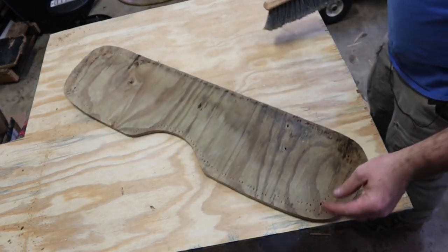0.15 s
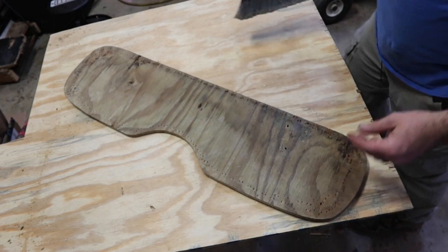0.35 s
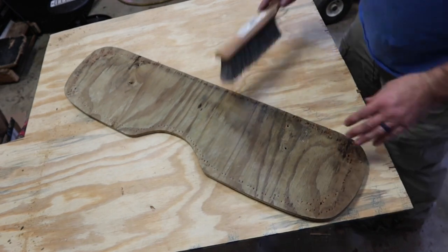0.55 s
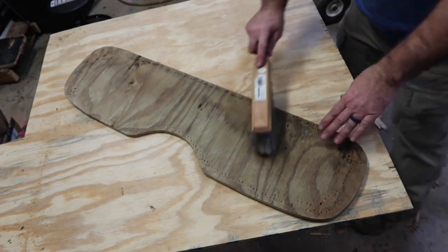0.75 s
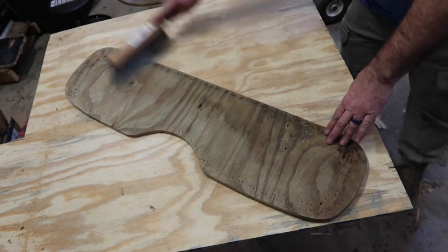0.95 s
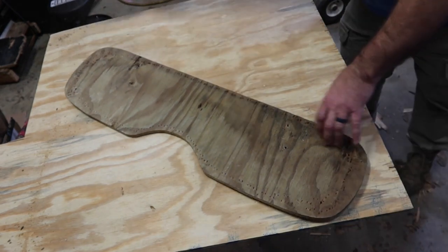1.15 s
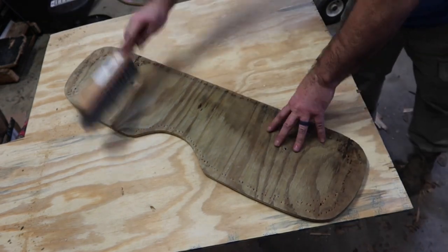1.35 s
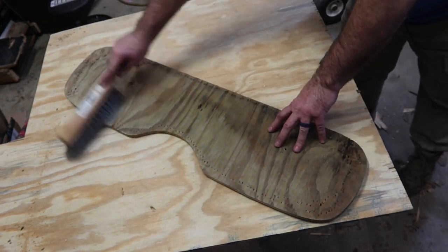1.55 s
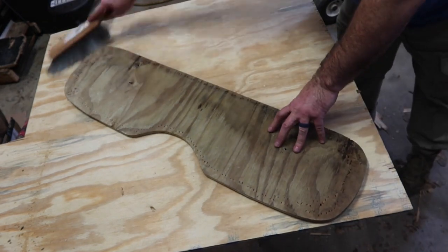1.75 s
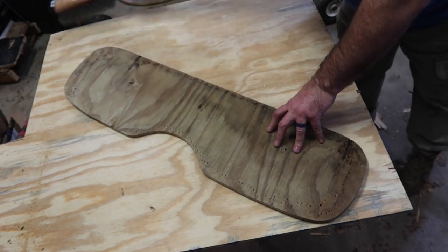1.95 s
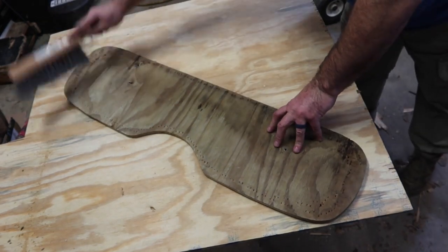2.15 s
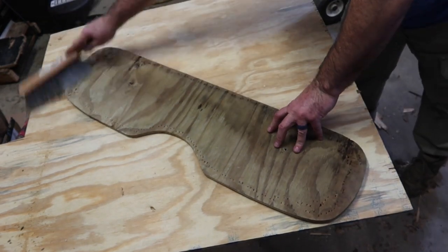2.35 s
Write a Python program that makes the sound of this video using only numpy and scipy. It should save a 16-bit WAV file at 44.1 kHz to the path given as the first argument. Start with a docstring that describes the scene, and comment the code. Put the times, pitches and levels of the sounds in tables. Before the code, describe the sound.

Plywood board knocks and rocks down on a wooden bench, followed by dry, hissy bristle brush strokes

```python
"""Heard first and closest: a shaped plywood board drops on a plywood table, rocks and knocks, and a stiff brush
sweeps it in short strokes. A hand slides and taps, loose grit ticks; the garage hums and hisses behind.
Knocks ring the modes of the wood, brushing is clumped random slips through coloured bands,
slaps and ticks are dying puffs of noise. One close, nearly mono microphone, with a little garage reverberation.
"""
import sys
import numpy as np
from scipy import signal
from scipy.fft import rfft, irfft, next_fast_len
from scipy.io import wavfile
from scipy.ndimage import uniform_filter1d, map_coordinates

SR = 44100
rng = np.random.default_rng(int(sys.argv[2]) if len(sys.argv) > 2 else 0)


def level_to_linear(level):
    """Convert decibel levels to linear amplitude factors, elementwise."""
    exponent = np.asarray(level, float) / 20
    return 10 ** exponent


def unload_wav(signal):
    """Save mono or channel-first audio to the path in sys.argv[1] as 16-bit WAV at rate SR, clipped to [-1, 1]."""
    wavfile.write(
        sys.argv[1],
        SR,
        np.round(np.clip(np.atleast_2d(signal).T, -1, 1) * 32767).astype(np.int16),
    )


N = 105840
T = np.arange(N) / SR

# Background hiss: [t/s, level/dB], and its colour: [f/Hz, relative level/dB]
AIR_LEVEL = [(0, -39), (.26, -48), (.275, -81.5), (.33, -45.5), (.9, -42), (1.5, -46.5), (2.15, -46.5),
             (2.23, -54.5), (2.4, -52)]
AIR_COLOUR = [(300, 3), (600, 9), (2600, -1.5), (5000, -4), (7000, -10), (12200, -9.5), (16300, -53)]
# Hum: mean pitch and level, both of which waver
HUM_HZ, HUM_DB = 187, -46
# Faint whistles: [f/Hz, level/dB], and their common bend: [t/s, share of pitch]
WHISTLES = [(10550, -58), (11850, -57), (13350, -63)]
WHISTLE_BEND = [(.03, -.02), (.075, .012), (.175, -.03)]
# Decay of the garage: [f/Hz, t60/s]
ROOM_DECAY = [(200, 0.76), (2000, 0.253), (12000, 0.32)]
ROOM_DB = -14.5

# Small wobbles of the board: [t/s, low band level/dB, upper band level/dB]
RATTLE_LEVEL = [(0, -37, -42), (.16, -41.5, -52), (.24, -29.5, -30.5), (.4, -25, -28.5), (.6, -39.5, -90.5),
                (.66, -29.5, -38.5), (1.1, -52.5, -82), (1.26, -27.5, -27.5), (1.38, -41, -62),
                (1.63, -31.5, -48), (1.72, -32, -32.5), (1.9, -33, -40), (2.05, -21, -38.5),
                (2.2, -35.5, -53), (2.4, -40.5, -53.5)]
# Colours of the two rattle bands: [f/Hz, relative level/dB]
RATTLE_LOW = [(20, 14.5), (60, 10), (200, 4), (350, -0.5), (650, -52)]
RATTLE_UP = [(250, -38), (400, -7.5), (850, -11.5), (3500, -30.5), (6000, -69)]
# Board edge dragging: [t/s, level/dB], and its colour: [f/Hz, relative level/dB]
SQUEAK_LEVEL = [(.15, -60), (.18, -33.5), (.23, -30.5)]
SQUEAK_COLOUR = [(560, -24), (790, 15), (890, 13.5), (1250, -42)]

# Loose grit ticking: [t/s, peak level/dB, centre f/Hz]
TICKS = [(0.7453, -13.5, 5035), (0.829, -24.5, 11600), (0.9, -17.5, 8900), (0.9365, -6.5, 10100),
         (0.9508, -8.5, 11500), (0.959, -14.5, 9900), (0.963, -10, 10300), (0.994, -3.5, 10500),
         (1.36, -26.5, 6000), (1.4163, -23.5, 11000), (1.4859, -20.5, 8440), (1.561, -28.5, 6600),
         (2.2034, -33, 3970), (2.2693, -30.5, 3650)]
# Hard edges slapping: [t/s, peak level/dB, centre f/Hz, width/octaves, t60/s]
SLAPS = [(.253, -19, 1040, 0.098, 0.055), (.2634, -6.5, 1760, 0.13, 0.011), (.2637, -20, 4350, 0.68, 0.014),
         (.365, -21, 3570, 0.6, 0.012), (.416, -25.5, 3673, 0.203, 0.228), (.9695, -16, 873, 0.19, 0.071),
         (.969, -10.5, 2690, 0.95, 0.061), (.9863, -4, 10000, 0.145, 0.02), (1.217, -4.5, 3000, 1.27, 0.05),
         (1.423, -23, 1800, 1.1, 0.012), (1.526, -32, 1023, 1.3, 0.04), (1.654, -14.5, 2730, 0.37, 0.025),
         (1.6536, -15, 6150, 0.94, 0.029)]
# Grit decay; width in octaves is TICK_WIDTH_HZ over the centre; treble limit of slaps and ticks
TICK_T60_S, TICK_WIDTH_HZ, TOP_HZ = 0.0025, 3500, 14000

# Board knocking on the table: [first touch t/s, peak level/dB, contact/ms, favoured f/Hz]
KNOCKS = [(0.23, -4.5, 0.55, 287), (0.262, -7.5, 0.61, 352), (0.274, -20.5, 0.575, 371),
          (0.342, -6.5, 0.57, 181), (0.362, -7, 0.143, 100.3), (0.384, -25, 0.86, 116),
          (0.477, -10.5, 0.67, 190), (0.487, -13.5, 1.3, 116), (0.651, -15, 1.7, 161.7),
          (0.754, -17.5, 2.3, 153.4), (0.814, -18, 1.7, 145.3), (0.924, -14.5, 1.3, 70.0),
          (0.943, -18, 0.29, 70.0), (0.966, -12, 0.324, 72), (1.215, -13.5, 0.2, 176),
          (1.249, -14, 1.6, 164), (1.295, -14.5, 6.7, 122), (1.393, -9, 0.69, 140),
          (1.529, -11.5, 0.75, 158), (1.649, -7, 0.83, 167), (1.687, -16, 0.67, 145),
          (1.729, -17, 1.1, 170), (2.013, -10.5, 0.27, 100), (2.107, -13.5, 1.3, 100)]
# Modes of board and table: [f/Hz, level/dB, t60/s]
WOOD_MODES = [(67.96, 10, 0.069), (100, 2, 0.14), (115.5, -3.5, 0.086), (166.3, 3, 0.1), (215, -0.5, 0.055),
              (273.3, -2, 0.08), (355.7, 0, 0.094), (503, -1, 0.075), (614.5, -1.5, 0.08), (802, -1, 0.076),
              (898, 4.5, 0.041), (1470, 5, 0.032)]
MODE_SCATTER_DB = 2  # random spread of each mode from knock to knock
FAVOUR_DB = 7.5  # loss per octave away from the favoured pitch
SETTLE_S = 0.002603  # the blow builds this long after first touch
SWELL_CYCLES = 0.35  # a mode takes this long to take up the blow, so the lows arrive last

# Brush strokes, a list of rows each:
# [t/s, bristle tips level/dB, bristle shafts over tips/dB, board scrape over tips/dB]
STROKES = [
    [(.61, -40, -13, -18.5), (.618, -32.5, -9.5, -12.5), (.665, -29.5, -1, -6.5), (.71, -42.5, 3.5, -1),
     (.865, -56, -6.5, -18.5)],
    [(.875, -48.5, 0.5, 7), (.91, -33.5, 1, -1), (.975, -24, -15, -13), (1.005, -27.5, -5.5, -6.5),
     (1.05, -23, -1.5, -5.5), (1.1, -21.5, -2, -9), (1.19, -24, -2, -13), (1.235, -38, 2.5, 4),
     (1.29, -43.5, 5.5, 4.5), (1.33, -66, 14, 12)],
    [(1.675, -47.5, 5, 12), (1.72, -33, 4.5, -4), (1.78, -33, 3.5, 0), (1.87, -30, 4.5, -2),
     (1.96, -32, 5, -0.5), (2.03, -36.5, 3.5, 1.5), (2.095, -44, 3.5, 3.5), (2.115, -55, 3, -3.5)],
]
# Hand and board sliding, same columns
SLIDES = [
    [(.13, -68, 0, 20), (.19, -41.5, -0.97, 0.52), (.24, -46.5, -1.2, 7.3)],
    [(.415, -44, 0.99, -24.5), (.46, -46, -0.27, 1), (.58, -68, 0, -5)],
    [(1.45, -58.5, 3, 7.2), (1.64, -59.5, -10, 7.5)],
]
# Colours of bristle tips, bristle shafts and board scrape: [f/Hz, relative level/dB]
TIPS_COLOUR = [(6000, -44), (8500, -5), (11700, -3), (14400, -25), (16000, -61)]
SHAFTS_COLOUR = [(3200, -18), (5000, -3.5), (8500, -6.5), (11000, -46)]
SCRAPE_COLOUR = [(400, -28), (1000, -10), (2000, -3), (3500, -2.5), (6500, -24)]
PATCH_DB = 2  # rms spread of the patches in the rubbing
# Tufts of bristles that sing as they bend: [start t/s, end t/s, from f/Hz, to f/Hz, lift/dB]
TUFTS = [(1.026, 1.085, 1750, 2205, 9), (1.655, 1.948, 6550, 10700, 5.5), (1.917, 2.041, 3480, 3350, 8.5),
         (1.989, 2.133, 5830, 5370, 6.5)]
TUFT_OCTAVES = 0.22

SIDE_DB, SIDE_TREBLE_DB = -35, 14  # side part below the middle, and its added treble
BASS_CUT_HZ, CUT_HZ = 140, 16300  # limits of the microphone


def unit(x):
    """Scaled to rms 1."""
    return x / np.sqrt(np.mean(x ** 2) + 1e-20)


def along(points, hz):
    """[f/Hz, value] points read on a log frequency axis."""
    f, value = np.transpose(points)
    return np.interp(np.log(hz + 1), np.log(f + 1), value)


def curves(rows):
    """A gate open over the rows' time span, and one curve for each column after the time."""
    s, *columns = np.transpose(rows)
    inside = np.minimum(T - s[0], s[-1] - T)
    gate = np.clip(inside / 0.0041 + 1, 0, 1)  # 4.1 ms ramps outside the span
    return gate, [np.interp(T, s, column) for column in columns]


def wobble(rate):
    """A smooth random curve, rate knots a second."""
    knots = rng.standard_normal(int(N * rate / SR) + 4)
    return map_coordinates(knots, [T * rate])


def coloured(x, spectrum):
    """x filtered to a spectrum, rms 1."""
    m = next_fast_len(N + 8192)
    gain = level_to_linear(along(spectrum, np.fft.rfftfreq(m, 1 / SR)))
    return unit(irfft(rfft(x, m) * gain, m)[:N])


def slips(per_s, spread_db, clump_db):
    """Stick-slip friction: random slips of uneven size that come in clumps."""
    hit = rng.random(N) < per_s / SR
    size_db = spread_db * rng.exponential(1, N)
    clumps_db = clump_db * (wobble(350) + wobble(60))
    return hit * rng.standard_normal(N) * level_to_linear(size_db + clumps_db)


def tone(hz):
    """A sine that follows a moving pitch."""
    return np.sin(2 * np.pi * np.cumsum(hz) / SR)


def background():
    """Behind the table: coloured noise hiss, a wavering hum and three faint bending whistles early on."""
    _, (air_db,) = curves(AIR_LEVEL)
    out = level_to_linear(air_db + 1.5 * wobble(8)) * coloured(rng.standard_normal(N), AIR_COLOUR)
    out += level_to_linear(HUM_DB + 1.63 * wobble(9.5)) * tone(HUM_HZ + 4 * wobble(37))
    gate, (bend,) = curves(WHISTLE_BEND)
    for hz, db in WHISTLES:
        level = gate * level_to_linear(db + 2.0 * wobble(60))
        out += level * tone(hz * (1 + bend) + 70 * wobble(85))
    return out


def garage(x):
    """Reverberation from a noise tail in which each frequency dies at its own speed."""
    hz, t, z = signal.stft(rng.standard_normal(SR // 2), SR, nperseg=256)
    decay = level_to_linear(-60 * t / along(ROOM_DECAY, hz)[:, None])
    tail = signal.istft(z * decay, SR, nperseg=256)[1]
    delayed = np.pad(x, (200, 0))  # samples before the room answers
    return signal.fftconvolve(delayed, tail / np.linalg.norm(tail))[:N]


def rattle():
    """The loose board keeps shifting on the table in small random bumps, and its edge squeaks once."""
    _, (low_db, up_db) = curves(RATTLE_LEVEL)
    low = coloured(slips(per_s=1200, spread_db=1.2, clump_db=1), RATTLE_LOW)
    up = coloured(slips(per_s=5000, spread_db=1.2, clump_db=1), RATTLE_UP)
    gate, (squeak_db,) = curves(SQUEAK_LEVEL)
    squeak = coloured(rng.standard_normal(N), SQUEAK_COLOUR)
    return level_to_linear(low_db) * low + level_to_linear(up_db) * up + gate * level_to_linear(squeak_db) * squeak


def slaps_and_ticks():
    """Each edge slap or grit tick is a short, dying puff of noise around its centre frequency."""
    length = 2048  # samples; longer decays are cut here
    out, t = np.zeros(N + SR), np.arange(length) / SR
    hz = np.fft.rfftfreq(length, 1 / SR) + 1
    grit = [(*row, TICK_WIDTH_HZ / row[2], TICK_T60_S) for row in TICKS]
    for s, db, centre_hz, octaves, t60 in SLAPS + grit:
        off = np.log2(hz / centre_hz) / octaves
        shape = np.exp(-.5 * off ** 2 - (hz / TOP_HZ) ** 8)
        band = irfft(rfft(rng.standard_normal(length)) * shape)
        onset = 1 - np.exp(-t / 0.00007)
        puff = level_to_linear(-60 * t / t60) * band * onset
        out[round(s * SR):][:length] += level_to_linear(db) * puff / np.abs(puff).max()
    return out[:N]


def knocks():
    """A soft push rings the wood's modes, all setting off together; where it lands favours some."""
    out, t = np.zeros(N + SR), np.arange(SR // 4) / SR
    hz, level_db, t60 = np.transpose(WOOD_MODES)[:, :, None]
    swell = 1 - np.exp(-t * hz / SWELL_CYCLES)
    for s, db, contact_ms, near_hz in KNOCKS:
        scatter_db = MODE_SCATTER_DB * rng.standard_normal((len(WOOD_MODES), 1))
        start_db = level_db + scatter_db - FAVOUR_DB * np.abs(np.log2(hz / near_hz))
        modes = swell * level_to_linear(start_db - 60 * t / t60) * np.sin(2 * np.pi * hz * t)
        ring = -modes.sum(0)
        u = t[:SR // 50] * 4000 / contact_ms  # the push peaks a quarter of the way through contact
        push = u * np.exp(-u)
        blow = np.convolve(ring, push)[:len(t)]
        out[round((s + SETTLE_S) * SR):][:len(t)] += level_to_linear(db) * blow / np.abs(blow).max()
    return out[:N]


def patchy(x):
    """Tufts of bristles come and go: drifting patches of gain over pitch and time."""
    z = signal.stft(x, nperseg=512)[2]
    field = uniform_filter1d(rng.standard_normal(z.shape), size=12, axis=0)  # over pitch
    field = uniform_filter1d(field, size=9, axis=1)  # over time
    return unit(signal.istft(z * level_to_linear(PATCH_DB * unit(field)), nperseg=512)[1][:N])


def singing(x):
    """Bending tufts lift gliding resonances, which swell and fade."""
    hz, t, z = signal.stft(x, SR, nperseg=512)
    for start, end, from_hz, to_hz, lift_db in TUFTS:
        u = np.clip((t - start) / (end - start), 0, 1)
        centre_hz = from_hz + (to_hz - from_hz) * u
        off = np.log2((hz[:, None] + 1) / centre_hz) / TUFT_OCTAVES
        z = z * level_to_linear(lift_db * np.sin(np.pi * u) * np.exp(-.5 * off ** 2))
    return signal.istft(z, nperseg=512)[1][:N]


def rubbing():
    """Bristle tips slip and hiss; the same motion flexes the shafts and scrapes the board, lower."""
    tips = patchy(coloured(slips(per_s=20000, spread_db=1.5, clump_db=1.1), TIPS_COLOUR))
    shafts = patchy(coloured(slips(per_s=20000, spread_db=1.5, clump_db=1.1), SHAFTS_COLOUR))
    scrape = patchy(coloured(slips(per_s=14000, spread_db=1.3, clump_db=1), SCRAPE_COLOUR))
    out = np.zeros(N)
    for rows in STROKES + SLIDES:
        gate, (tips_db, shafts_db, scrape_db) = curves(rows)
        out += gate * level_to_linear(tips_db) * (tips + level_to_linear(shafts_db) * shafts + level_to_linear(scrape_db) * scrape)
    return singing(out)


def scene():
    """Everything near the middle; a weak side part, brighter on top, from a short scramble of phases."""
    near = rubbing() + knocks() + slaps_and_ticks() + rattle()
    mid = near + level_to_linear(ROOM_DB) * garage(near) + background()
    treble = np.convolve(mid, [1, -2, 1], 'same')
    scramble = unit(rng.standard_normal(64)) / np.sqrt(64)
    side = level_to_linear(SIDE_DB) * np.convolve(mid + level_to_linear(SIDE_TREBLE_DB) * treble, scramble)[:N]
    return np.array([mid + side, mid - side])


def top_cut(x):
    """Nothing passes above the cut-off."""
    return signal.sosfilt(signal.butter(12, 16470, fs=SR, output="sos"), x)


def record(dry):
    """The close microphone drops deep bass gently and the extreme top sharply."""
    m = next_fast_len(N + 8192)
    hz = np.fft.rfftfreq(m, 1 / SR)
    bass_cut = 1j * hz / (BASS_CUT_HZ + 1j * hz)
    mix = irfft(rfft(dry, m) * bass_cut * (hz < CUT_HZ), m)[:, :N]
    return top_cut(mix)


dry = scene()
out = record(dry)
unload_wav(out)
```